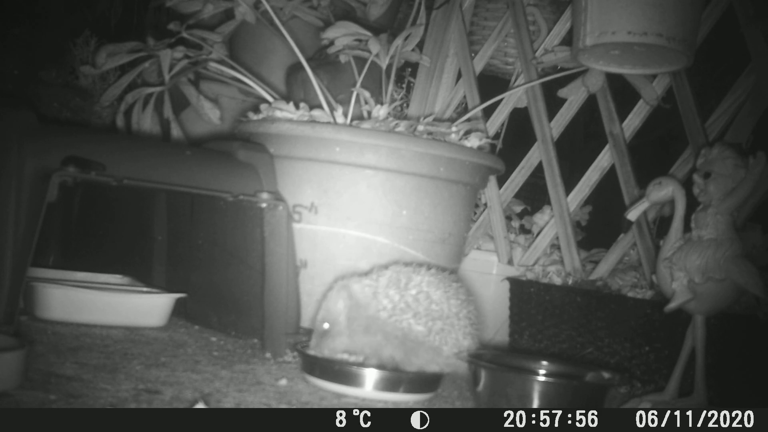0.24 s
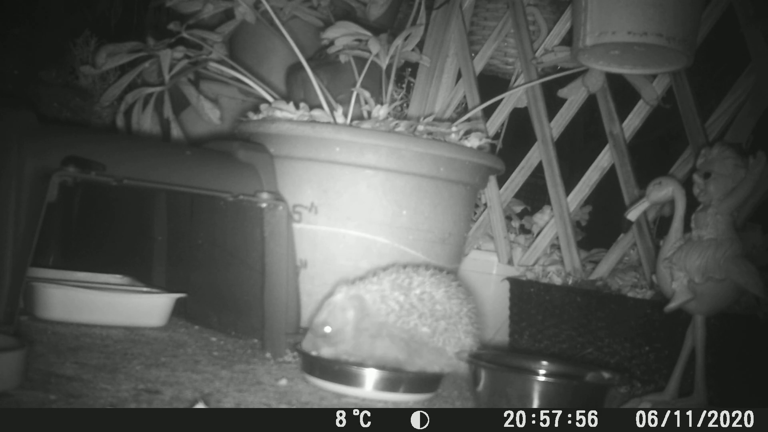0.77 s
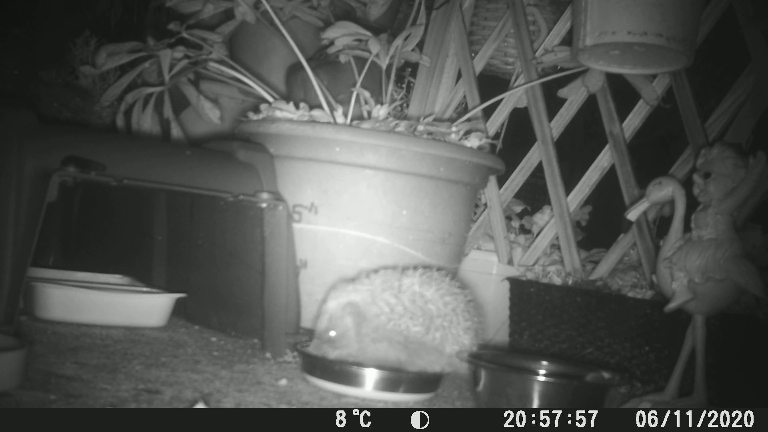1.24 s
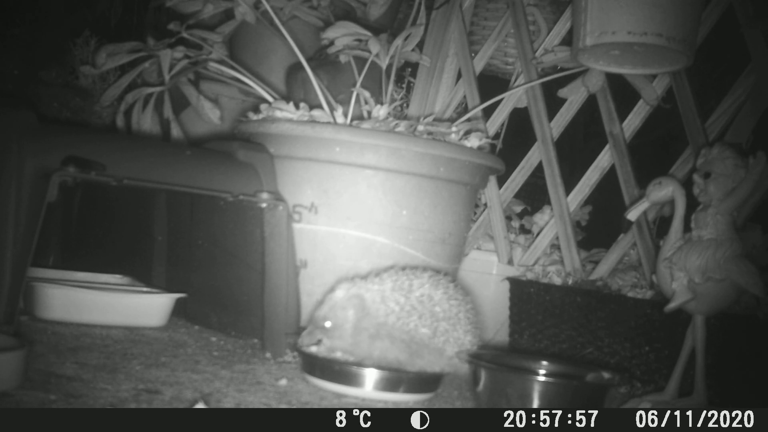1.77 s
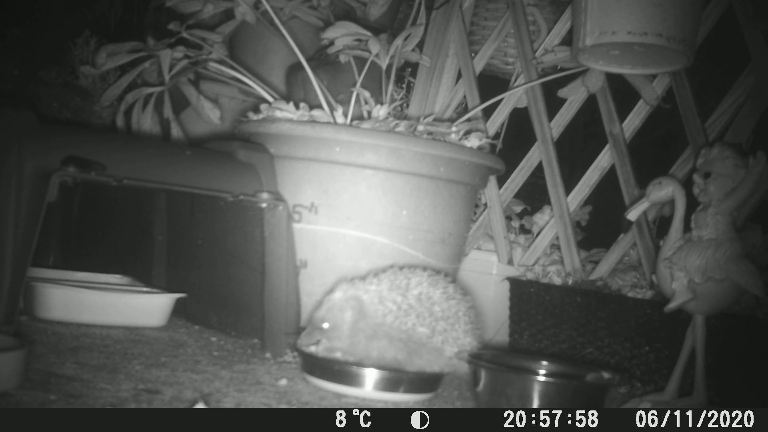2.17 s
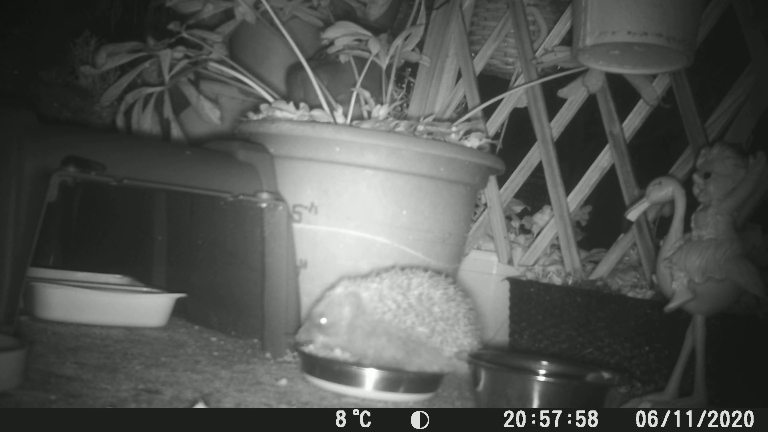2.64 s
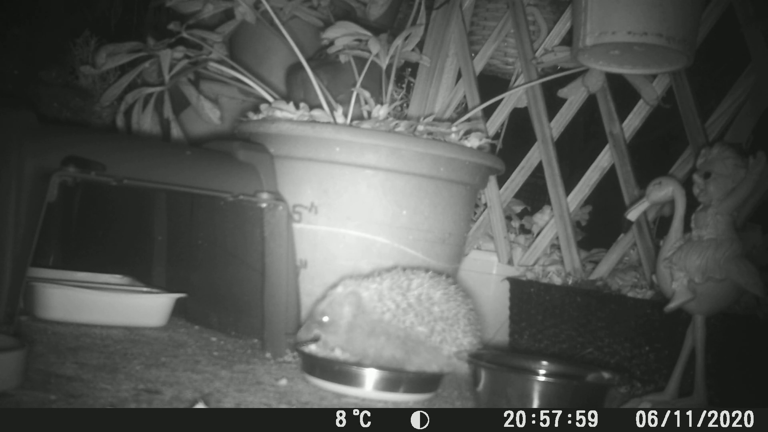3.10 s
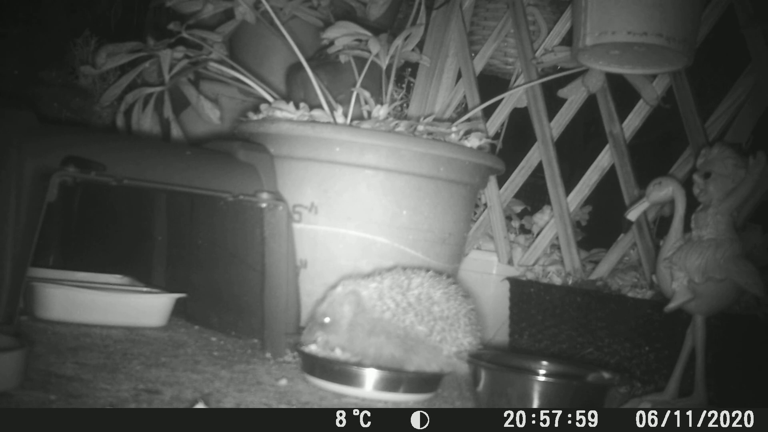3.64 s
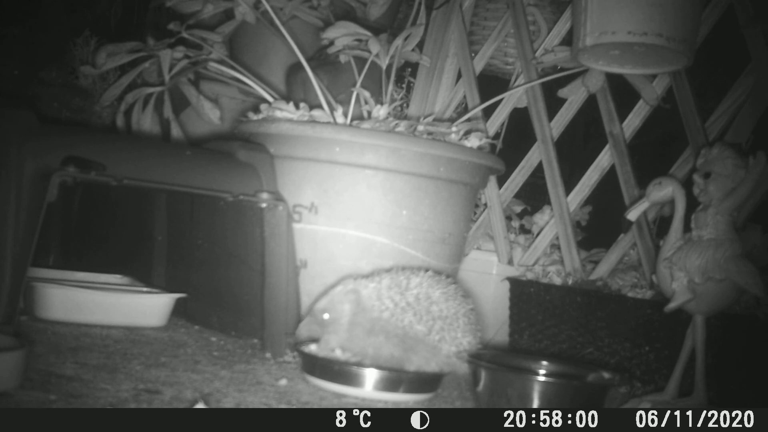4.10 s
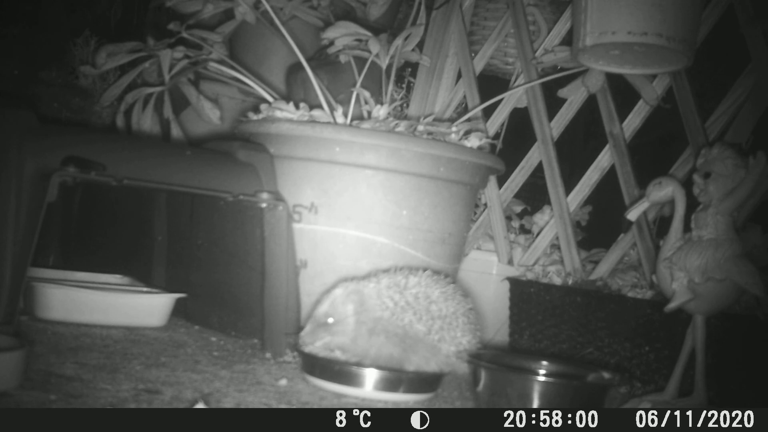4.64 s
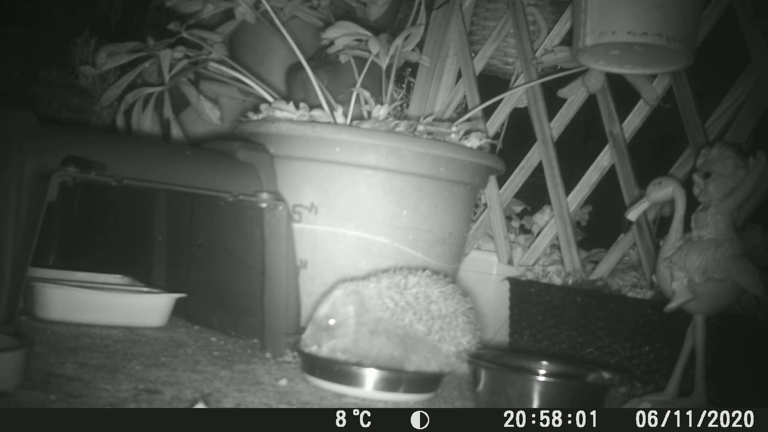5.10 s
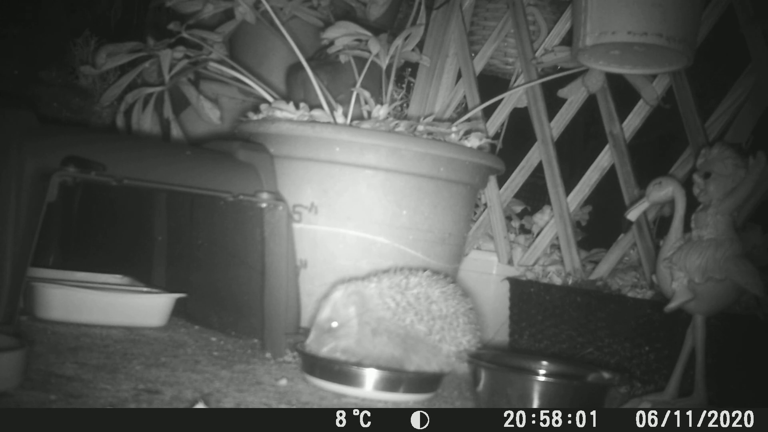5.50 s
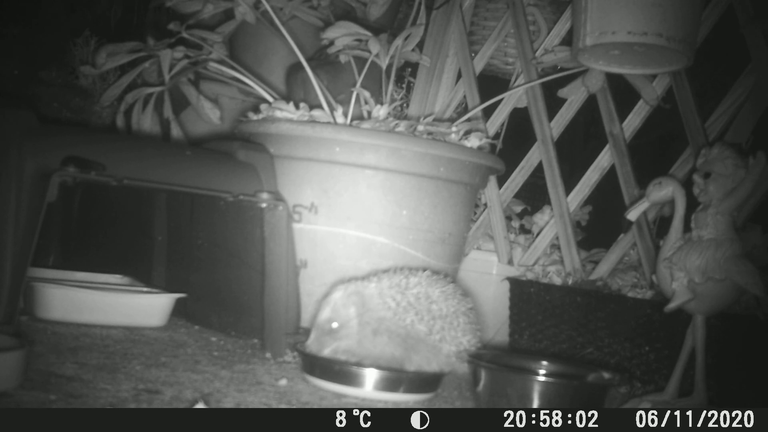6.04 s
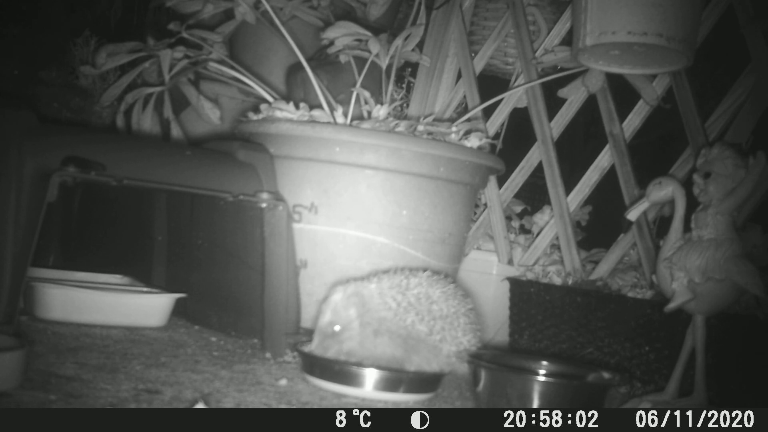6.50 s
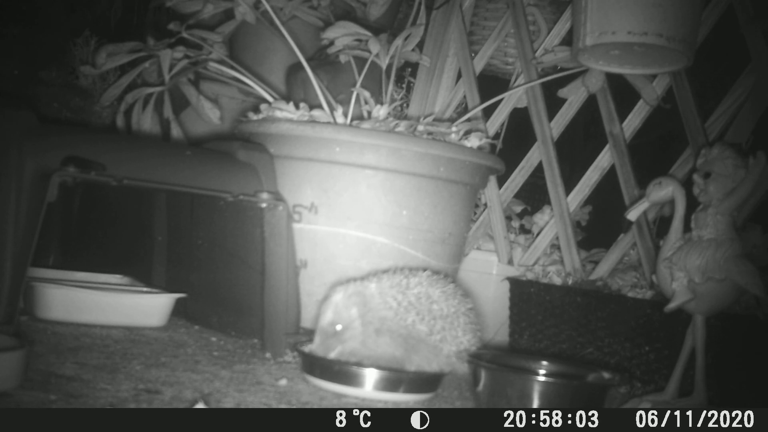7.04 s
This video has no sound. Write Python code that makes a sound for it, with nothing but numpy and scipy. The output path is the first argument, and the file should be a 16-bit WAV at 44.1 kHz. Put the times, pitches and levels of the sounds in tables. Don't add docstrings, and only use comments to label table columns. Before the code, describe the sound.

A small walled garden at night, heard by a close microphone in a camera case, with dulled top end. Steady soft hiss, low wind buffeting and distant town rumble run throughout, with tiny electronic ticks and buzzes in pairs, five pairs a second. At 0.1 and 0.6 s a steel dish is nudged; faint nibbles come at 0.4 and 0.9, with a tiny wet lip squeak at 0.46. A dry biscuit cracks at 0.96, loudest at 1.08, then pieces crunch and crumble until 1.5 while the dish hums in jerks. More bites at 1.7, 1.9 to 2.1 and 2.4, a clean snap at 3.0, smaller ones at 3.6 and 4.1 to 4.3. Dish scrapes at 4.4 and 5.26 end the eating. Distant fireworks thud at 1.1, 2.3, 3.2, 3.9, 5.0 and, loudest, 5.8, each with clustered echoes off houses. Only background and ticking remain.

```python
import sys
import numpy as np
from scipy import signal
from scipy.fft import rfft, irfft
from scipy.io import wavfile
from scipy.ndimage import uniform_filter1d

SR = 44100
rng = np.random.default_rng(int(sys.argv[2]) if len(sys.argv) > 2 else 0)


def dump_mix(stems):
    frames = np.atleast_2d(stems).T
    limited = np.clip(frames, -1, 1)
    pcm = np.round(limited * 32767).astype(np.int16)
    wavfile.write(sys.argv[1], SR, pcm)


def attenuation_scalar(level_db):
    decades = np.asarray(level_db, float) / 20
    return 10 ** decades


N = 320607

# start in seconds, snap peak in dB, dish bottom in dB,
# crumble in dB, crumble pitch in Hz.
WHOLE_BISCUITS = [
    (0.957, -53.5, -67, -60, 6970),
    (1.0846, -45, -60, -55, 6700),
    (2.05, -61, -55.5, -62, 7160),
    (3.0204, -55.5, -85, -61.5, 7170),
    (3.0527, -68, -85, -65.5, 5960),
]
# start in seconds, snap peak in dB, dish bottom in dB,
# crumble in dB, crumble pitch in Hz.
PIECES = [(1.1035, -70, -69, -65, 6800), (1.2986, -58, -70, -67.5, 6400), (1.362, -58, -61, -68.5, 6390),
          (1.3961, -57.5, -61.5, -63.5, 6660), (1.4037, -71, -71, -62.5, 7240),
          (1.4367, -70, -57.5, -73, 6300), (1.6823, -55, -66, -62, 7070), (1.931, -60, -63.5, -66, 5260),
          (1.954, -57, -80.5, -64, 5640), (2.0986, -66, -61.5, -68.5, 6660),
          (2.369, -59, -54.5, -59.5, 6660), (2.406, -62, -62, -67, 6370), (3.0792, -64, -86, -62, 5770),
          (3.6123, -64, -73, -68, 7040), (4.321, -62, -59, -63.5, 5750)]
# start in seconds, snap peak in dB, dish bottom in dB.
NIBBLES = [(0.4348, -66, -88), (0.8822, -71, -83), (0.902, -62, -76), (1.6074, -68, -83),
           (1.9957, -70, -70), (2.1396, -68.5, -80), (4.08, -78, -66), (4.2414, -69, -73),
           (4.2697, -73, -72)]
WHOLE_SNAP_HZ, PIECE_SNAP_HZ = 3260, 2320
NIBBLE_CRUMBLE_DB, NIBBLE_CRUMBLE_HZ = -10, 6400

# pitch in Hz, level in dB, time to fall 60 dB in seconds.
DISH_TONES = [(2200, -1, .022), (2750, -9, .012), (3200, -4, .016), (3980, -11, .012)]
DISH_BOTTOM_HZ, DISH_BOTTOM_T60_S = 1105, 0.029
# start in seconds, length in seconds, first slip peak in dB,
# last slip peak in dB.
SLIDES = [(1.099, 0.023, -62, -60), (1.143, 0.043, -59, -67), (1.196, 0.02, -59, -63),
          (1.411, .03, -56, -59), (1.464, .015, -61, -73), (1.718, .085, -61, -68), (4.38, 0.019, -74, -67),
          (5.261, 0.017, -66.5, -66)]
# start in seconds, peak in dB.
NUDGES = [(0.1027, -67), (0.605, -64.5), (1.287, -69), (2.003, -63), (2.478, -72), (3.2715, -68),
          (3.5, -71)]
SLIP_GAP_S, SLIP_LENGTH_S = .017, .017
UPPER_DISH_SHARE = .7

SQUEAK_S, SQUEAK_HZ, SQUEAK_LENGTH_S = .458, 990, .018
# multiple of the squeak pitch, level in dB.
SQUEAK_OVERTONES = [(2, -77.5), (4, -73), (5, -75), (6, -83)]

# start in seconds, peak in dB, sharpness of the middle echo in dB,
# sharpness of the last echo in dB, brightness of the scatter in dB.
FIREWORKS = [
    (1.117, -56, -1.5, -3, 6.5),
    (2.294, -55.5, 4, 2, 2.5),
    (3.179, -57, 6, -1.5, 3.3),
    (3.935, -58, -1, -14, 4.5),
    (4.963, -58.5, 9, -6, 5),
    (5.819, -53, 0.5, -2, -4.5),
]
# delay in seconds, polarity (sign and size), thump in dB, knock in dB,
# yard in dB, crack in dB, scatter in dB.
ECHO_PATHS = [(.002, 1, 10.5, -5, -11.5, -33, -26.5), (.018, 1, -1, -19, -17.5, -32, -19),
              (0.067, 0.47, -7, -26, -7, -12, -13), (.092, -0.79, 14.5, -22, -25.5, -20.5, -13),
              (.136, -1, 16.5, -12, -7, -1.5, -7), (0.152, -1.07, 11.5, -25, -16.5, -12, -14.5)]
# pitch in Hz, level in dB, time to fall 60 dB in seconds.
THUMP_TONES = [(73.3, 3.5, 0.071), (110.7, -10, 0.15)]
# pitch in Hz, level in dB, time to fall 60 dB in seconds.
KNOCK_TONES = [(223, 3.5, 0.043), (243, -2.5, 0.012), (400, -7, 0.021)]
# pitch in Hz, level in dB, time to fall 60 dB in seconds.
YARD_TONES = [(366, 0, .24), (345, -9, .08)]
# pitch in Hz, level in dB, time to fall 60 dB in seconds.
CRACK_TONES = [(1053, 5.5, 0.019), (857, -7.5, 0.016), (1370, -8.5, 0.019), (1550, -10.5, 0.011),
               (2070, -11, 0.021)]

FIRST_WRITE_S, WRITES_PER_S = .0985, 5
# wait at the start in seconds, time in seconds after which the slot is held back.
SLOT_WAITS = [(0, 3), (.014, 9), (.007, 3), (.021, 9), (0, 9)]
CATCH_UP_S_PER_S, HELD_BACK_S = 0.0038, .02
PAIR_GAP_S, PAIR_GAP_SPREAD_S = .033, .0022
BLIP_DB, BLIP_SPREAD_DB, SECOND_BLIP_DB = -71, 1.3, 0.5
BUZZ_DB, BUZZ_SPREAD_DB, SECOND_BUZZ_DB = -88, 2.8, -2
# start in seconds, blip in dB, buzz in dB.
STRAY_WRITES = [(3.5666, -72, -93), (4.5696, -72, -93.5)]
# pitch in Hz, level in dB.
WRITE_TONES = [(4560, -1), (5120, 0)]
# pitch in Hz, width in Hz, level in dB.
WRITE_BUZZ = [(2370, 97, -5), (5000, 430, -6), (6700, 580, 0.5), (6200, 4100, 0.5), (7170, 1300, -7),
              (7700, 160, -8.5)]

# pitch in Hz, level in dB per Hz.
AIR_COLOUR = [(71, -32), (120, -2), (154, -19.5), (184, -6), (213, -4), (246, -6.5), (371, -11.5),
              (541, -19.5), (602, -28), (893, -17.5), (977, -15.5), (2970, -23), (4560, -30.5),
              (7270, -29.5), (8700, -40), (11300, -76), (19100, -120)]
# pitch in Hz, width in Hz, level in dB relative to the hiss.
AIR_LIFTS = [(359.7, 34, -15), (1150, 330, -20), (2020, 750, -13.5), (5280, 150, -36.5), (6200, 230, -23),
             (6660, 470, -20), (7230, 150, -21.5)]
AIR_DB = -70.5
# time in seconds, level in dB.
WIND = [(0, -52), (0.75, -51), (1.6, -46), (2.4, -51.5), (3.1, -49), (4.1, -50), (4.6, -55), (5.5, -48),
        (6.3, -52), (7.27, -49)]
# time in seconds, level in dB.
TOWN = [(0, -52), (0.9, -50.5), (1.3, -50), (1.8, -52.5), (2.3, -49), (2.7, -52.5), (3.5, -49.5),
        (4.1, -50), (4.7, -52.5), (5.2, -50.5), (5.65, -49.5), (6.0, -51), (6.7, -50), (7.27, -53)]
CASE_DIP_HZ, CASE_DIP_WIDTH_HZ = 641, 67


def bites():
    out, length = np.zeros(N), SR // 8
    age = np.arange(length) / SR
    for s, low_db, bottom_db, high_db, high_hz, low_hz in all_bites():
        snap = spray(age, 0.058)
        crumbs = spray(age, np.clip(0.066 + 0.002 * (high_db - low_db), .03, .09))
        low = attenuation_scalar(-16.5) * ring_all(snap, DISH_TONES)
        low += attenuation_scalar(-9) * band(snap, 2000, 4200)
        low += attenuation_scalar(10.5) * band(snap, low_hz - 200, low_hz + 200, order=1)
        high = attenuation_scalar(-2.5) * band(crumbs, 5300, 7320) + band(crumbs, high_hz - 650, high_hz + 650)
        shove = (age < .004) * np.sin(2 * np.pi * DISH_BOTTOM_HZ * age) / 80 + snap / 60
        bottom = band(ring(shove, DISH_BOTTOM_HZ, DISH_BOTTOM_T60_S), 850, 1400)
        bite = attenuation_scalar(low_db - 7.0) * band(low, 1700, 4800)
        bite += attenuation_scalar(high_db + 7.5) * high + attenuation_scalar(bottom_db + 5.0) * bottom
        at = round(s * SR)
        out[at:at + length] += bite
    return out


def all_bites():
    nibbles = [(s, db, bottom_db, db + NIBBLE_CRUMBLE_DB, NIBBLE_CRUMBLE_HZ) for s, db, bottom_db in NIBBLES]
    whole = [(*row, WHOLE_SNAP_HZ) for row in WHOLE_BISCUITS]
    return whole + [(*row, PIECE_SNAP_HZ) for row in PIECES + nibbles]


def spray(age, t60):
    fall = attenuation_scalar(-60 * age / t60)
    hits = rng.random(len(age)) < 12000 / SR
    cracks = hits * rng.standard_normal(len(age)) * fall
    cracks /= np.sqrt(np.sum(cracks ** 2) / np.sum(fall ** 2))
    cracks[0] = 2.8
    return cracks


def slips():
    waver = rms_one(band(rng.standard_normal(N), 39, 190, order=1))
    hum = np.sin(2 * np.pi * np.cumsum(1110 + 70 * waver) / SR)
    rub = hum + .5 * rms_one(band(rng.standard_normal(N), 900, 1300))
    s, peak_db = slip_times()
    push = gate(s, attenuation_scalar(peak_db), SLIP_LENGTH_S, 0.44) * rub
    return attenuation_scalar(-40.5) * (ring(push, DISH_BOTTOM_HZ, 0.016) + UPPER_DISH_SHARE * ring(push, 1500, .02))


def slip_times():
    rows = list(NUDGES)
    for s, length, first_db, last_db in SLIDES:
        count = 1 + round(length / SLIP_GAP_S)
        rows += zip(np.linspace(s, s + length, count), np.linspace(first_db, last_db, count))
    return np.transpose(rows)


def squeak():
    t = np.arange(N) / SR
    tone = sum(attenuation_scalar(db) * np.sin(2 * np.pi * k * SQUEAK_HZ * t) for k, db in SQUEAK_OVERTONES)
    return gate([SQUEAK_S], 0.97, SQUEAK_LENGTH_S, 1.0) * tone


def fireworks():
    delay, sign, thump_db, knock_db, yard_db, crack_db, scatter_db = np.transpose(ECHO_PATHS)
    out, length = np.zeros(N), SR // 2
    low = ring_all(clicks(delay + 0.0026, sign * attenuation_scalar(thump_db), size=length), THUMP_TONES)
    low += ring_all(clicks(delay, attenuation_scalar(yard_db), size=length), YARD_TONES)
    spread = fade(clicks(delay, attenuation_scalar(scatter_db), size=length), 0.19)
    for s, peak_db, middle_db, last_db, bright_db in FIREWORKS:
        tail = spread * rng.standard_normal(length)
        knocks = clicks(delay, sign * attenuation_scalar(knock_db), size=length)
        knock = ring_all(knocks + attenuation_scalar(-25.0) * tail, KNOCK_TONES)
        dull = signal.sosfilt(signal.butter(2, 520, fs=SR, output="sos"), low + knock)
        sharp_db = np.where(delay > .12, last_db, middle_db)
        fronts = clicks(delay + 0.00415, attenuation_scalar(crack_db + sharp_db), size=length)
        early = fronts * (np.arange(length) < .12 * SR)
        sharp = band(ring_all(fronts, CRACK_TONES), 700, 1400)
        sharp += attenuation_scalar(1.5) * band(ring(early, CRACK_TONES[1][0], .025), 540, 1100)
        scatter = attenuation_scalar(-28) * ring_all(tail, CRACK_TONES) + attenuation_scalar(-6.0) * band(tail, 610, 2300)
        bright = band(sharp + attenuation_scalar(bright_db) * scatter, 460, 2600)
        at = round(s * SR)
        out[at:at + length] += attenuation_scalar(peak_db + 1.0) * (dull + bright)
    return out


def camera_writes():
    s, peak_db, buzz_db = write_times()
    t = np.arange(N) / SR
    whine = sum(attenuation_scalar(db) * np.sin(2 * np.pi * hz * t) for hz, db in WRITE_TONES)
    blip = gate(s - .001, attenuation_scalar(peak_db), .005, 0.27) * whine
    load = attenuation_scalar(buzz_db)
    busy = gate(s - .001, load, .026, 0.17) + .5 * gate(s - .001, load, 0.012, 0.45)
    hold = attenuation_scalar(-0.5) * rms_one(band(rng.standard_normal(N), 5060, 5200))
    return attenuation_scalar(-7) * blip + busy * lifts(WRITE_BUZZ) + gate(s, load, PAIR_GAP_S, 0.23) * hold


def write_times():
    due = np.arange(FIRST_WRITE_S, N / SR - .1, 1 / WRITES_PER_S)
    wait, held_from = np.resize(SLOT_WAITS, (len(due), 2)).T
    shrinking = np.maximum(wait - CATCH_UP_S_PER_S * due, 0)
    first = due + np.where(due > held_from, HELD_BACK_S, shrinking)
    gap, *chance = rng.standard_normal((len(due), 5)).T
    blip_db = BLIP_DB + BLIP_SPREAD_DB * np.array(chance[:2]) + [[0], [SECOND_BLIP_DB]]
    buzz_db = BUZZ_DB + BUZZ_SPREAD_DB * np.array(chance[2:]) + [[0], [SECOND_BUZZ_DB]]
    s = np.append(first, first + PAIR_GAP_S + PAIR_GAP_SPREAD_S * gap)
    return np.hstack([[s, blip_db.ravel(), buzz_db.ravel()], np.transpose(STRAY_WRITES)])


def air_hiss():
    return attenuation_scalar(AIR_DB) * (coloured(AIR_COLOUR) + lifts(AIR_LIFTS))


def rumble():
    (wind_db,), (town_db,) = in_time(WIND), in_time(TOWN)
    return attenuation_scalar(wind_db) * even_noise(13, 45.3, 0.067) + attenuation_scalar(town_db) * even_noise(48.1, 92.6, 0.19)


def through_case(x):
    return signal.lfilter(*signal.iirnotch(CASE_DIP_HZ, CASE_DIP_HZ / CASE_DIP_WIDTH_HZ, SR), x)


def clicks(seconds, heights, size=N):
    out = np.zeros(size)
    out[np.round(np.asarray(seconds) * SR).astype(int)] = heights
    return out


def gate(seconds, heights, length_s, soft):
    window = signal.windows.tukey(int(length_s * SR), np.clip(soft, 0, 1))
    return np.convolve(clicks(seconds, heights), window)[:N]


def fade(x, t60):
    return signal.lfilter([1], [1, -attenuation_scalar(-60 / (t60 * SR))], x + 1e-18)


def ring(x, hz, t60):
    r, w = attenuation_scalar(-60 / (t60 * SR)), 2 * np.pi * hz / SR
    return signal.lfilter([0, np.sin(w)], [1, -2 * r * np.cos(w), r * r], x + 1e-18)


def ring_all(x, tones):
    return sum(attenuation_scalar(db) * ring(x, hz, t60) for hz, db, t60 in tones)


def band(x, low_hz, high_hz, order=2):
    return signal.sosfilt(signal.butter(order, [low_hz, high_hz], "band", fs=SR, output="sos"), x)


def rms_one(x):
    return x / np.sqrt(np.mean(x ** 2) + 1e-20)


def lifts(table):
    noise = rng.standard_normal(N)
    return sum(attenuation_scalar(db) * rms_one(band(noise, hz - width / 2, hz + width / 2, order=1)) for hz, width, db in table)


def coloured(spectrum):
    hz, db = np.transpose(spectrum)
    bins = np.log(np.fft.rfftfreq(N, 1 / SR) + 1)
    gain = attenuation_scalar(np.interp(bins, np.log(hz), db))
    return rms_one(irfft(rfft(rng.standard_normal(N)) * gain, N))


def even_noise(low_hz, high_hz, even_s):
    x = band(rng.standard_normal(N + SR), low_hz, high_hz, order=3)[SR:]
    size = int(even_s * SR)
    power = uniform_filter1d(uniform_filter1d(x ** 2, size=size), size=size)
    return rms_one(x / np.sqrt(power + 0.08 * power.mean()))


def in_time(rows):
    s, *columns = np.transpose(rows)
    return [np.interp(np.arange(N) / SR, s, c) for c in columns]


def scene():
    outside = bites() + slips() + squeak() + fireworks()
    return (through_case(outside) + camera_writes() + air_hiss() + rumble())[None]


def roll_off(x):
    return signal.sosfilt(signal.butter(12, 8850, fs=SR, output="sos"), x)


def record(dry):
    cut = signal.sosfilt(signal.cheby2(10, 40, 9200, fs=SR, output="sos"), dry)
    return roll_off(cut)


dry = scene()
out = record(dry)
dump_mix(out)
```